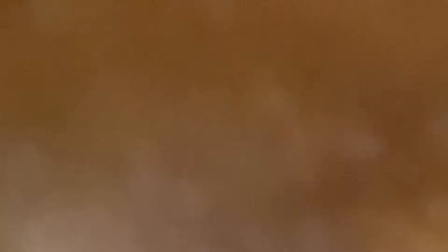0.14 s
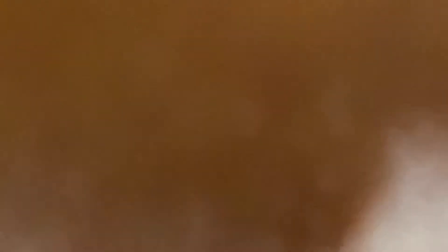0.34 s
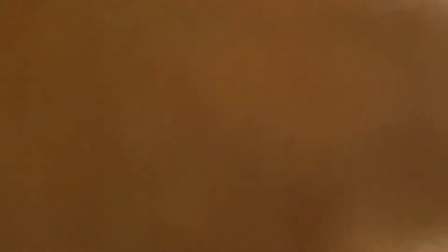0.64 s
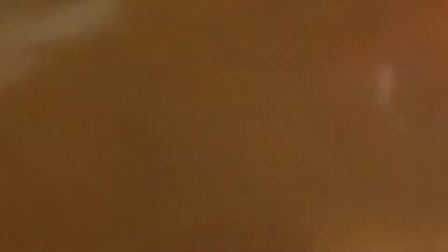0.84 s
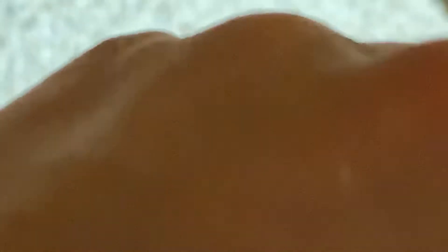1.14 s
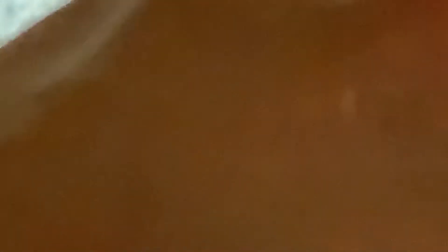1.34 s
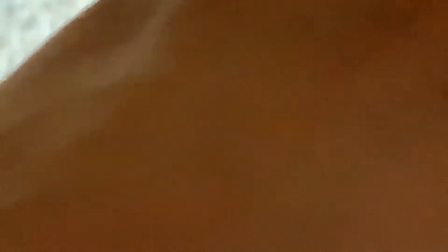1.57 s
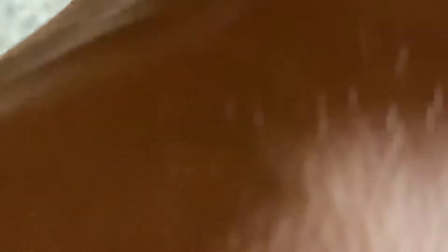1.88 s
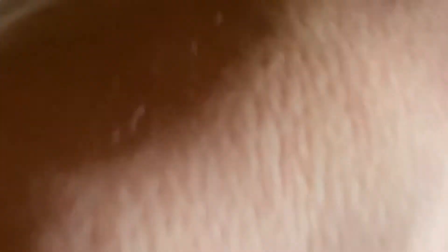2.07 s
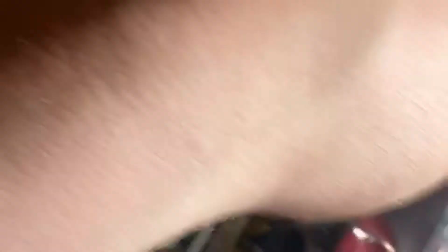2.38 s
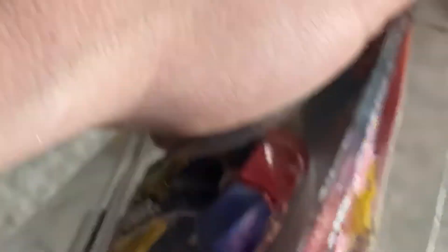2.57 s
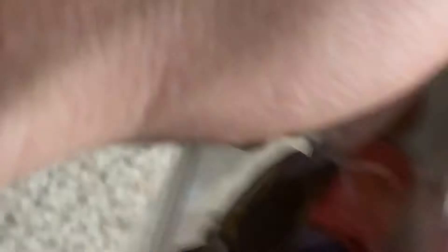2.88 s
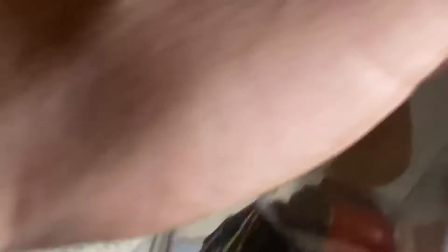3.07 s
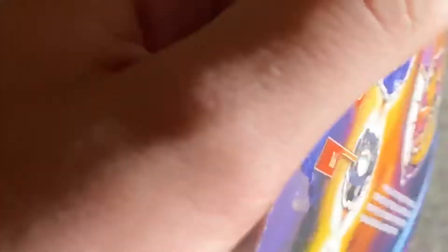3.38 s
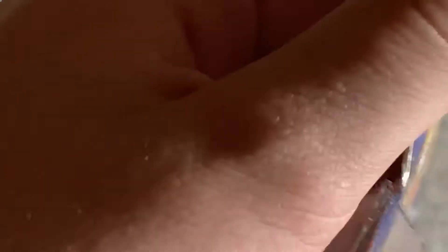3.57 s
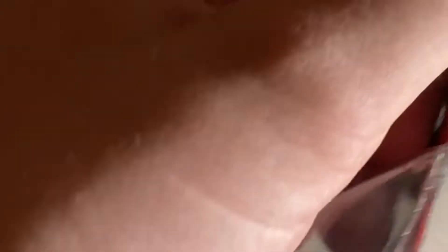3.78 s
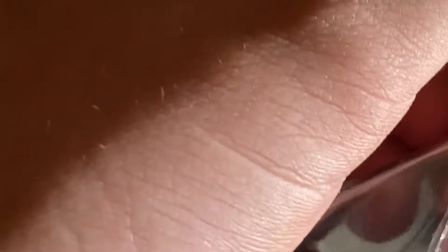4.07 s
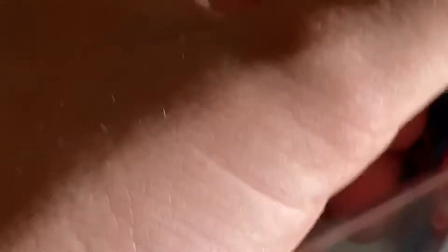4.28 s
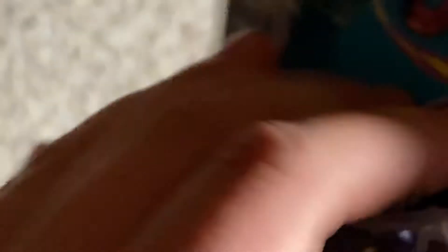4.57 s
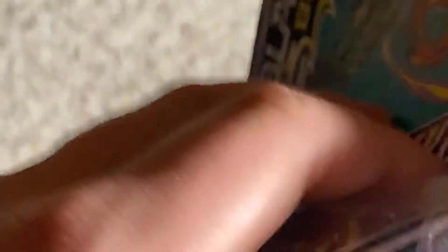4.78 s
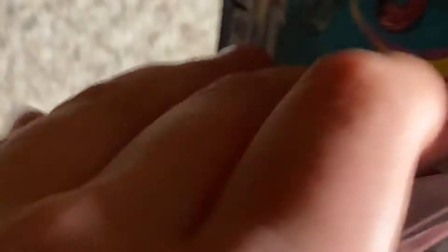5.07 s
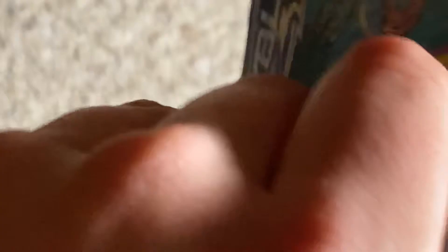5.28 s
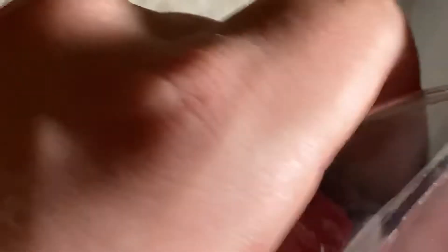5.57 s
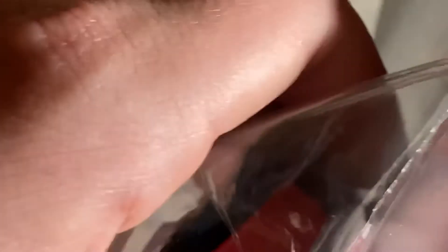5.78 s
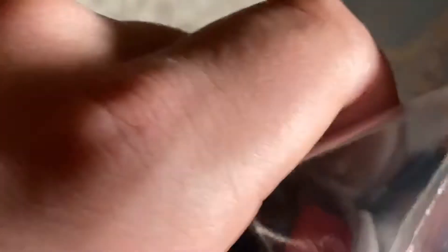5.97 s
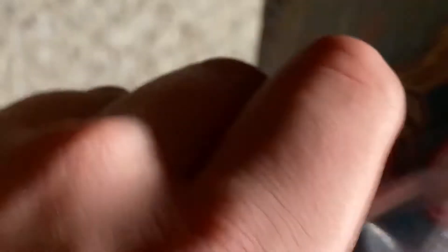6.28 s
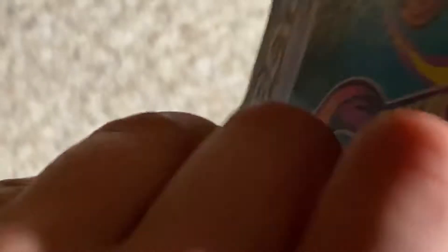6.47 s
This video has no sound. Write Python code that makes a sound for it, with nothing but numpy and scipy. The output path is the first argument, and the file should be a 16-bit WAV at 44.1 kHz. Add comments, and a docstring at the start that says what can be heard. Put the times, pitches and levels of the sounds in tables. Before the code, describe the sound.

A stiff plastic blister pack is worked off its cardboard backing, very close to the microphone in a quiet carpeted room. Two sharp plastic snaps come at about 0.3 and 0.4 seconds, followed by faint finger rubbing and small ticks. From 1.7 to 2.3 seconds there are three short, crackly rips with loud cracks and cardboard knocks. A thin, bright click follows at 2.6 seconds, then a snap and a soft low bump on the carpet at 3.1. The handling turns quieter, with light clicks and faint bumps until about 4.6 seconds. A short rip comes near 4.9. From 5.2 seconds the plastic crinkles densely while glue and card fibres tear, with two more soft thumps around 6 and 6.2 seconds. A stronger rip starts at 6.5 seconds and runs to the end just afterwards.

```python
"""Opening a blister pack, close up

A quiet carpeted room, the microphone right beside the hands. Fingers and a knife work a plastic
blister off its card: glue and fibres rip in bursts of fine crackle over rubbing skin, the stiff plastic
snaps and knocks the card, and the pack bumps down on the carpet. The mono sound is widened to stereo."""
import sys
import numpy as np
from scipy import signal
from scipy.fft import rfft, irfft, next_fast_len
from scipy.io import wavfile
from scipy.ndimage import uniform_filter1d, map_coordinates

SR = 44100
rng = np.random.default_rng(int(sys.argv[2]) if len(sys.argv) > 2 else 0)


def put_to_file(sound):
    """Save the sound as 16-bit audio at rate SR, in the file named by the first command-line argument."""
    columns = np.atleast_2d(sound).T  # one column per channel
    safe = np.clip(columns, -1, 1)
    whole_steps = np.round(safe * 32767)
    wavfile.write(sys.argv[1], SR, whole_steps.astype(np.int16))


N = 292824


def amp(db):
    return 10 ** (np.asarray(db) / 20)


def unit_rms(x):
    return x / np.sqrt(np.mean(x ** 2) + 1e-20)


def along(points, hz):
    """Read (frequency, value) points on a log axis."""
    f, v = np.transpose(points)
    return np.interp(np.log(hz + 1), np.log(f + 1), v)


def curves(rows):
    """One value per sample for each column after the time."""
    times, *columns = np.transpose(rows)
    return np.array([np.interp(np.arange(N) / SR, times, c) for c in columns])


def wobble(rate):
    """A smooth random curve, rate knots a second."""
    return map_coordinates(rng.standard_normal(int(N * rate / SR) + 4), [np.arange(N) * rate / SR])


def filtered(x, response):
    """x through a complex frequency response."""
    m = next_fast_len(x.shape[-1] + 2048)
    return irfft(rfft(x, m) * response(np.fft.rfftfreq(m, 1 / SR)), m)[..., :x.shape[-1]]


def shaped(x, spectrum):
    """x coloured by (frequency, level) points, rms 1."""
    return unit_rms(filtered(x, lambda hz: amp(along(spectrum, hz))))


def modes(table, hz):
    """Causal response of (frequency, width, level) resonances."""
    return sum((-1) ** k * amp(db) * 1j * hz * width / (centre ** 2 - hz ** 2 + 1j * hz * width)
               for k, (centre, width, db) in enumerate(table))


# the quiet room: (frequency [Hz], level [dB])
ROOM_TONE = [(20, -26), (60, 5), (300, 3.5), (1000, -8), (1600, -18.5), (3400, -7.5), (6000, -30.5),
             (16000, -40)]
def room_tone():
    """A faint, low hush behind the hands."""
    return amp(-67.5) * shaped(rng.standard_normal(N), ROOM_TONE)


# fingers sliding over the pack: (time [s], crackle [dB], card body [dB], fizz [dB])
RUBBING = [(0.0, -70, -55, -85), (0.11, -72, -69, -87), (0.33, -71.5, -58, -82), (0.65, -69.5, -72, -72.5),
           (0.89, -71, -64.5, -95), (1.41, -78.5, -72.5, -76.5), (2.0, -61.5, -59, -85),
           (2.09, -69, -59, -60.5), (2.35, -68.5, -57.5, -70.5), (2.59, -72.5, -81.5, -80.5),
           (2.75, -60, -63, -76), (2.96, -67.5, -65.5, -70.5), (3.48, -72, -66, -73.5),
           (3.66, -70, -63, -88), (3.83, -73, -68.5, -100), (4.08, -79.5, -79, -92.5),
           (4.29, -66.5, -79, -88.5), (4.46, -59, -62, -65), (4.9, -68.5, -58, -80),
           (5.18, -78.5, -67.5, -89.5), (5.33, -46, -72, -51.5), (5.4, -47, -69.5, -49),
           (5.66, -54, -56, -59), (5.94, -56, -60.5, -62), (6.12, -55, -53, -58.5),
           (6.29, -61.5, -50, -69.5), (6.51, -65, -52, -65.5), (6.64, -36, -38.5, -60.5)]
# rips and scrapes: (full at [s], rise [s], hold [s], fall [s], crackle [dB], card body [dB], fizz [dB])
TEARS = [(0.24, 0.011, .025, 0.017, -61, -49.5, -64), (.41, 0.015, 0.03, 0.17, -56, -48.5, -51.5),
         (0.698, 0.18, 0.062, 0.22, -61.5, -63, -63), (1.141, 0.039, .005, 0.046, -50.5, -44, -65.5),
         (1.498, 0.064, .005, 0.039, -51, -48.5, -53), (1.687, 0.019, 0.0018, .06, -30.5, -28, -33),
         (1.965, 0.037, 0.092, 0.06, -33.5, -35, -36), (2.158, .03, 0.022, .05, -51, -51, -51.5),
         (2.219, 0.038, 0.0041, 0.016, -29.5, -41, -30), (2.559, 0.025, 0.065, .2, -55, -93, -56),
         (2.857, 0.16, .01, 0.1, -50.5, -49.5, -61.5), (3.243, 0.25, 0.058, 0.18, -55, -53.5, -63.5),
         (3.502, .15, 0.276, 0.1, -67, -68, -74), (4.339, 0.186, 0.098, 0.13, -57, -52.5, -66.5),
         (4.856, 0.032, 0.0032, 0.059, -35, -36, -34.5), (5.207, 0.1, 0.073, 0.11, -45, -43, -46.5),
         (5.365, 0.081, 0.0033, 0.065, -30.5, -34, -34), (5.506, 0.14, 0.0025, 0.18, -31, -36.5, -38.5),
         (5.636, 0.18, 0.0056, 0.061, -39, -46.5, -46.5), (5.837, .02, 0.0022, 0.05, -47, -36.5, -47),
         (6.012, .08, 0.042, 0.072, -47, -41, -55), (6.209, 0.16, 0.064, 0.039, -42.5, -47, -53),
         (6.511, 0.034, 0.033, .1, -35, -37.5, -38), (6.577, 0.11, 0.0037, 0.44, -28, -36, -33)]
def strain(fade_db=30):
    """Gains of crackle, body and fizz: rubbing, plus rips whose rise and fall each span fade_db."""
    t = np.arange(N) / SR
    power = amp(2 * curves(RUBBING))
    for s, rise, hold, fall, *levels_db in TEARS:
        before = np.maximum(s - t, 0) / rise
        after = np.maximum(t - s - hold, 0) / fall
        power += amp(2 * np.array(levels_db))[:, None] * amp(-2 * fade_db * (before + after))
    return np.sqrt(power)


def patchy(x, depth_db):
    """The colour wanders as different parts of the sheet take the strain."""
    z = signal.stft(x, nperseg=256)[2]
    field = uniform_filter1d(rng.standard_normal(z.shape), size=4, axis=0)
    field = uniform_filter1d(field, size=12, axis=1)
    return signal.istft(z * amp(depth_db * unit_rms(field)), nperseg=256)[1][:N]


# sheet crackle, airy fizz and handling rumble at close range: (frequency [Hz], level [dB])
SHEET_SPECTRUM = [(1100, -43.5), (1550, -10), (2050, -4.5), (3000, -3), (4500, -5.5), (6200, -2.5),
                  (7500, -8), (9000, -21.5)]
FIZZ_SPECTRUM = [(6500, -36), (8000, 1.5), (10000, -4), (12000, -3), (14500, -1), (15800, 0),
                 (17000, -30.5)]
RUMBLE_SPECTRUM = [(25, -41.5), (50, -8.5), (100, 0), (200, 3.5), (300, 2.5), (420, -36)]
# resonances of the card and blister cavity: (frequency [Hz], width [Hz], level [dB])
CARD_MODES = [(230, 43, -1), (281, 84, 2), (518, 180, 5), (760, 190, 5.5), (1080, 443, 2)]
def ripping(breaks_per_s=700, break_t60_s=.0013, rumble_db=-14, rumble_lag_s=.01):
    """Fibres and glue part as tiny breaks on a rubbing hiss; the same breaks shake sheet, card and air."""
    crackle_gain, body_gain, fizz_gain = strain()
    breaks = (rng.random(N) < breaks_per_s / SR) * amp(np.minimum(2.3 * rng.exponential(size=N), 11))
    breaks = np.convolve(breaks, amp(-60 * np.arange(200) / SR / break_t60_s))[:N]
    flicker = amp(1.8 * wobble(45) + wobble(120))
    noise = flicker * (unit_rms(breaks) + 1.6) * rng.standard_normal((3, N))
    crackle = crackle_gain * shaped(patchy(noise[0], depth_db=4), SHEET_SPECTRUM)
    fizz = fizz_gain * shaped(noise[1], FIZZ_SPECTRUM)
    body = body_gain * unit_rms(filtered(noise[2], lambda hz: modes(CARD_MODES, hz)))
    # a lumpy rumble follows the card sluggishly
    keep = np.exp(-1 / (rumble_lag_s * SR))
    rumble_gain = amp(rumble_db) * signal.lfilter([1 - keep], [1, -keep], body_gain)
    lumps = amp(5 * wobble(12))
    rumble = rumble_gain * shaped(lumps * rng.standard_normal(N), RUMBLE_SPECTRUM)
    return crackle + fizz + body + rumble


def levelled(burst, share):
    """Partly level a burst's chance spectral peaks: a break excites all pitches alike."""
    z = rfft(burst)
    broad, fine = (uniform_filter1d(np.abs(z), size=bins) for bins in (120, 24))
    return irfft(z * (broad / (fine + 1e-9)) ** share, len(burst))


def sheet_response(hz, pitch_hz):
    """The buckling patch favours its own pitch: a peak there, a slope away on both sides."""
    slope_db = -5 * np.abs(np.log2((hz + 1) / pitch_hz))
    peak = 1 + 2.72 / (1 + ((hz - pitch_hz) / (.026 * pitch_hz)) ** 2)
    return amp(along(SHEET_SPECTRUM, hz) + slope_db) * peak


def card_response(hz, pitch_hz, soft_hz=3570):
    """The card rings at its modes, lifted at the knock's pitch, and softens the treble."""
    lift = 1 + modes([(pitch_hz, 200, 5)], hz)
    return modes(CARD_MODES, hz) * lift / (1 + 1j * hz / soft_hz) ** 2


def faint_snaps(per_s=8.3, over_rubbing_db=13, spread_db=1.5):
    """Rows for small snaps at chance moments, following the level of the rubbing."""
    draws = rng.random((int(20 * N / SR), 5))
    s = np.cumsum(-np.log(draws[:, 0])) / per_s
    draws, s = draws[s < N / SR], s[s < N / SR]
    size_db = over_rubbing_db + 2 * spread_db * (draws[:, 1:3] - .5)
    crack_db, knock_db, air_db = curves(RUBBING)[:, (s * SR).astype(int)] + size_db[:, [0, 1, 0]].T
    crack_hz, knock_hz = 1700 * 4 ** draws[:, 3], 350 * 3 ** draws[:, 4]
    thud_db = knock_db - 12.5
    return list(zip(s, crack_db, crack_hz, air_db, knock_db, knock_hz, thud_db))


# the blister's clear snaps beside the microphone, as peak levels:
# (time [s], crack [dB], crack pitch [Hz], air [dB], knock [dB], knock pitch [Hz], thud [dB])
BUCKLES = [(0.0139, -48.5, 2050, -65, -41.5, 435, -67), (0.0508, -30, 2530, -47, -47, 1060, -67),
           (0.0888, -40, 1980, -69, -40, 764, -57.5), (0.1219, -39.5, 2470, -81, -54.5, 896, -75),
           (0.2536, -6.5, 6580, -26.5, -3.5, 544, -52), (0.3685, -53, 1930, -75, -57, 1060, -66),
           (0.4216, -4.5, 3770, -14.5, -10.5, 500, -41), (0.4885, -43.5, 3620, -53.5, -43, 458, -60),
           (0.5931, -36, 2060, -40, -52, 835, -68), (0.6114, -48, 2490, -60, -46, 782, -68),
           (0.6774, -49, 2020, -46, -53, 1040, -63), (0.7976, -43.5, 3140, -58, -44.5, 890, -50.5),
           (0.824, -40, 3070, -70, -25.5, 891, -53), (0.8848, -39, 3390, -41, -49.5, 350, -66),
           (1.063, -43, 2900, -51, -53, 1110, -73), (1.1314, -41, 2595, -60, -39, 447, -46),
           (1.2156, -70, 2410, -90, -44, 466, -51.5), (1.274, -55, 5780, -62, -60, 292, -70.5),
           (1.3594, -55.5, 5760, -55.5, -50.5, 498, -61), (1.3938, -64.5, 1900, -84, -38, 506, -54),
           (1.4072, -66.5, 3160, -79, -33, 572, -59), (1.4621, -40.5, 1940, -47, -39.5, 990, -54),
           (1.4916, -50, 2020, -60.5, -40.5, 910, -63), (1.6455, -41, 2110, -35.5, -44, 902, -67.5),
           (1.6558, -37.5, 6130, -41.5, -65, 598, -63), (1.6784, -20, 3540, -27, -23.5, 991, -36),
           (1.6876, -14, 5670, -27.5, -33, 520, -33.5), (1.7035, -22.5, 3160, -51, -25.5, 630, -49),
           (1.8895, -40.5, 2620, -53.5, -40.5, 770, -66), (1.9068, -33.5, 6060, -32, -36.5, 520, -37),
           (1.9586, -20, 5250, -33.5, -16, 714, -32), (1.9688, -15.5, 2205, -29, -13, 706, -37),
           (1.981, -6, 6180, -21.5, -13, 590, -45), (2.157, -43.5, 5670, -46, -53.5, 738, -68),
           (2.2079, -24, 5630, -24.5, -28.5, 705, -53), (2.2178, -8, 2880, -11, -16.5, 1230, -47),
           (2.2234, -17, 2650, -33.5, -18, 736, -31.5), (2.5529, -34, 3650, -40, -55, 297, -67),
           (2.5583, -27, 5700, -21, -79, 322, -73), (2.5815, -27, 6860, -31.5, -74, 297, -78),
           (2.6074, -39, 5880, -26, -80, 1230, -80), (2.6243, -15.5, 4900, -16, -69, 1240, -84),
           (2.7334, -45, 2420, -64, -34.5, 710, -69), (2.7726, -36, 6890, -30, -51, 581, -76),
           (2.8265, -33, 2020, -51, -44.5, 650, -73), (2.8706, -43, 3860, -48, -40, 678, -62),
           (2.8912, -28.5, 5540, -28, -36, 525, -67), (2.9303, -37, 4560, -36.5, -52, 485, -73),
           (3.0285, -52, 1964, -74.5, -74, 458, -73), (3.0488, -40.5, 2100, -73, -46, 860, -74),
           (3.0926, -46.5, 6380, -55, -65, 420, -69), (3.1291, -17, 2223, -43, -14, 754, -53),
           (3.1382, -17.5, 2160, -26, -13.5, 610, -25), (3.3635, -49, 2270, -59.5, -49.5, 409, -75),
           (3.4554, -41.5, 3270, -49, -61.5, 441, -69), (3.5491, -48, 3200, -57, -68, 307, -68),
           (3.5917, -47, 2200, -58, -48, 800, -61), (3.6523, -44, 1900, -53, -43, 490, -51),
           (3.688, -34.5, 1970, -38.5, -36, 450, -51), (4.0304, -38, 2220, -45, -27, 298, -34.5),
           (4.3345, -32.5, 2290, -65, -30.5, 361, -51), (4.3486, -28, 2220, -68, -39, 960, -55),
           (4.3934, -34, 2220, -65, -36, 1020, -64), (4.4154, -41, 2320, -54, -36, 530, -68),
           (4.441, -35, 2520, -64, -57, 748, -69), (4.4826, -38, 3140, -59, -43, 1110, -72),
           (4.5714, -40, 2200, -58, -39, 291, -34), (4.5844, -30.5, 2130, -43, -24.5, 1070, -32),
           (4.656, -36, 2350, -45, -31.5, 536, -37.5), (4.8417, -24.5, 5650, -18.5, -26.5, 660, -36),
           (4.8594, -25.5, 6650, -30, -37, 1290, -45), (4.9229, -28.5, 4470, -46, -31.5, 1340, -65),
           (4.9451, -28, 2300, -45, -25.5, 1096, -45), (5.0004, -44, 3600, -60, -40.5, 896, -72),
           (5.0434, -57, 2240, -84, -26, 1020, -60.5), (5.1486, -33.5, 4900, -31, -43, 799, -64),
           (5.1574, -42, 2210, -53, -34.5, 816, -62), (5.1691, -28, 2000, -52, -34, 538, -41),
           (5.2086, -32, 2100, -50, -27, 810, -45), (5.253, -32, 2100, -45, -44.5, 1240, -42),
           (5.2856, -25.5, 1990, -51, -30.5, 550, -59), (5.3078, -27, 2334, -47, -28, 1320, -57),
           (5.3253, -20, 2100, -36.5, -23.5, 760, -59), (5.3476, -20, 2030, -39.5, -24, 845, -42),
           (5.3637, -16, 4600, -39.5, -25, 480, -58), (5.3854, -25, 2020, -47.5, -28.5, 1090, -54),
           (5.4343, -29, 6300, -45, -50, 1260, -61), (5.4635, -25, 6360, -42, -50, 541, -53),
           (5.4861, -20.5, 6600, -41.5, -38, 1080, -42), (5.5534, -28, 6470, -50, -47, 1240, -70),
           (5.686, -19.5, 1957, -26.5, -33, 1060, -52), (5.7032, -10.5, 1890, -20, -24.5, 1250, -58),
           (5.7397, -16.5, 1831, -28.5, -26, 584, -60), (5.8039, -18, 1980, -43, -30, 570, -59),
           (5.8231, -17, 1970, -53, -20, 1250, -67), (5.8304, -24, 2440, -34.5, -32, 800, -63),
           (5.8559, -15, 1960, -23.5, -24.5, 825, -50), (5.8926, -24.5, 2993, -49, -27.5, 1320, -47),
           (5.9269, -27.5, 6060, -31, -24, 1100, -47), (5.9584, -24.5, 2040, -41, -24.5, 1090, -37.5),
           (6.0028, -26, 2654, -34, -26.5, 1100, -44), (6.0109, -27, 2707, -42, -27.5, 595, -33.5),
           (6.0375, -26.5, 6910, -46, -47.5, 554, -38), (6.0975, -39.5, 1970, -60, -35, 291, -45),
           (6.2054, -20, 2574, -41.5, -25.5, 293, -33), (6.2785, -15.5, 2316, -35, -20, 523, -48),
           (6.326, -27.5, 3295, -34.5, -41, 668, -49), (6.3834, -28, 2170, -45, -29, 1050, -44),
           (6.4033, -26.5, 2150, -57.5, -49, 708, -40), (6.4355, -45, 3230, -58, -61, 479, -57),
           (6.4587, -36, 2180, -56, -51, 530, -59), (6.4754, -30.5, 2150, -67, -30.5, 781, -58),
           (6.4874, -23, 2060, -46, -33, 760, -41), (6.5176, -22.5, 2570, -42.5, -38, 1280, -43),
           (6.542, -20, 2225, -46, -38.5, 291, -39), (6.5674, -22.5, 6870, -39.5, -32.5, 584, -31),
           (6.5839, -24.5, 3013, -28.5, -26, 293, -35), (6.5924, -22, 2400, -34, -26.5, 325, -26.5)]
def snaps(base_decay_s=.013, decay_spread_db=1.5, card_rise_s=.0012):
    """Each buckle of the plastic cracks, then knocks the card and thuds into the hand."""
    out, t = np.zeros(N + SR), np.arange(SR // 10) / SR
    for s, crack_db, crack_hz, air_db, knock_db, knock_hz, thud_db in list(BUCKLES) + faint_snaps():
        decay_s = max(base_decay_s * amp(decay_spread_db * rng.standard_normal()), .003)
        fall = lambda stretch: amp(-60 * t / (stretch * decay_s))
        burst = rng.standard_normal((4, len(t))) * (1 - np.exp(-t / (.021 * decay_s)))
        buckle = levelled(burst[0] * fall(3.6), .18)
        crack = fall(1.8) * filtered(buckle, lambda hz: sheet_response(hz, crack_hz))
        air = fall(.73) * shaped(burst[1], FIZZ_SPECTRUM)
        swing = 1 - np.exp(-t / card_rise_s)
        push = levelled(burst[2] * fall(1) * swing, .66) * fall(7)
        knock = filtered(push, lambda hz: card_response(hz, knock_hz))
        thud = filtered(burst[3] * fall(9.7), lambda hz: modes([(160, 170, 0)], hz) ** 2)
        for db, part in (crack_db, crack), (air_db, air), (knock_db, knock), (thud_db, thud):
            out[round(s * SR):][:len(t)] += amp(db) * part / np.max(np.abs(part))
    return out[:N]


# the room's short decay: (frequency [Hz], t60 [s])
ROOM_DECAY = [(100, 0.18), (500, 0.074), (2000, 0.09), (6000, 0.21), (14000, .1)]
def reverb(x):
    """The energy of each band lingers and dies away in the room, carried by fresh noise."""
    hz, t, z = signal.stft(x, SR, nperseg=256)
    dulled = z / (1 + (hz[:, None] / 4500) ** 2)  # carpet and hands swallow the treble
    power = uniform_filter1d(np.abs(dulled) ** 2, size=5, axis=0)
    keep = amp(-120 * t[1] / along(ROOM_DECAY, hz))
    held = [signal.lfilter([0, 0, 1 - k], [1, -k], p) for k, p in zip(keep, power)]
    noise = signal.stft(rng.standard_normal(N), SR, nperseg=256)[2]
    noise /= np.sqrt(np.mean(np.abs(noise) ** 2))
    return signal.istft(noise * np.sqrt(np.abs(held)), SR, nperseg=256)[1][:N]


# gain of the widening copy: (frequency [Hz], level [dB])
WIDTH = [(60, -16.5), (1000, -8), (1550, 0), (2000, -16.5), (6800, -20), (7800, 0), (8500, -6), (9400, -7),
         (10100, -18), (11100, 2.5), (12100, -23), (13000, -13), (14000, -28.5), (14800, -3.5),
         (16000, -12.5)]
def stereo_width(x):
    """A random-phase copy, opposite in left and right, that widens certain bands."""
    hz, _, z = signal.stft(x, SR, nperseg=256)
    turns = np.exp(2j * np.pi * rng.random(z.shape))
    side = signal.istft(z * turns * amp(along(WIDTH, hz))[:, None], SR, nperseg=256)[1][:N]
    return np.array([side, -side])


# the pack meeting the carpet: (time [s], level [dB], pitch [Hz], t60 [s])
FLOOR_BUMPS = [(3.132, -29.5, 91, 0.26), (3.69, -45, 106.1, 0.2), (4.036, -38, 99.7, 0.26),
               (4.58, -37.5, 89, .15), (6.008, -31.5, 91, 0.2), (6.209, -29.5, 81.5, 0.083)]
def floor_bumps(rise_s=.0039):
    """The pack bumps down and the floor booms, a soft low ring whose pitch wavers."""
    out, t = np.zeros(N), np.arange(SR // 3) / SR
    for s, db, hz, t60 in FLOOR_BUMPS:
        phase = 2 * np.pi * hz * t + wobble(46)[:len(t)]
        envelope = amp(db - 60 * t / t60) * (1 - np.exp(-t / rise_s))
        out[round(s * SR):][:len(t)] += envelope * np.sin(phase)
    return out


def scene():
    """The close pack and the room around it in mono, then widened."""
    pack = snaps() + ripping()
    mono = pack + amp(-10.5) * reverb(pack) + floor_bumps() + room_tone()
    return mono + stereo_width(mono)


# left channel over right: (frequency [Hz], level [dB])
STEREO_BALANCE = [(60, 1.5), (500, 1.5), (850, 4), (1400, 3), (1750, -4), (2000, 0), (16000, 0)]
# left channel's phase minus the right's: (frequency [Hz], phase [half turns])
STEREO_PHASE = [(60, .05), (1300, 0), (1500, -.2), (2000, 0), (3200, .12), (4200, 0), (7400, 0),
                (7700, -.4), (8350, -.95), (8650, -1.05), (9700, -1.95), (10500, -2.05), (11600, -2.95),
                (12400, -3.03), (13600, -3.97), (14400, -4.03), (15200, -4.9), (17000, -5.1)]
def record(dry, ceiling=.93, bass_cut_hz=38, top_hz=16840):
    """A fixed left/right level and phase filter; loud cracks round off, deep bass and top are cut."""
    half = np.array([[.5], [-.5]])
    balance = lambda hz: amp(half * along(STEREO_BALANCE, hz))
    phase = lambda hz: np.exp(1j * np.pi * half * along(STEREO_PHASE, hz))
    wide = filtered(dry, lambda hz: balance(hz) * phase(hz))
    rounded = wide / (1 + np.abs(wide / ceiling) ** 6) ** (1 / 6)
    return filtered(rounded, lambda hz: (hz < top_hz) * hz ** 2 / (hz ** 2 + bass_cut_hz ** 2))


dry = scene()
out = record(dry)
put_to_file(out)
```